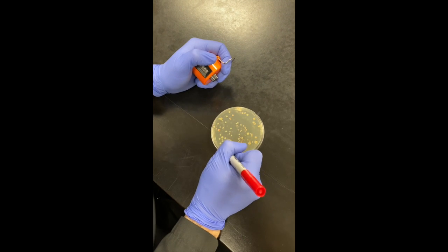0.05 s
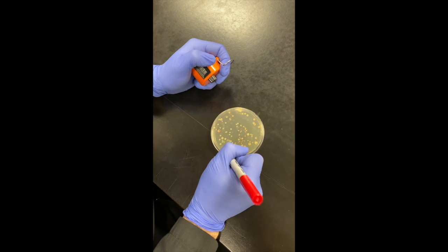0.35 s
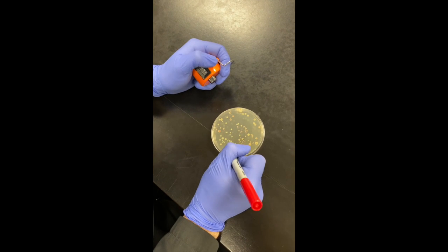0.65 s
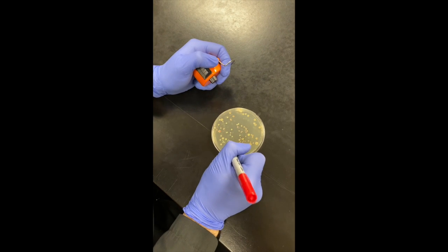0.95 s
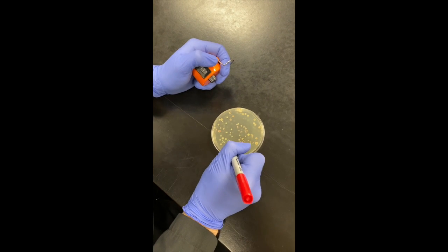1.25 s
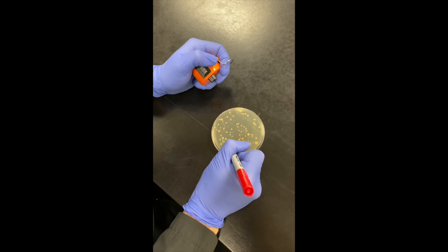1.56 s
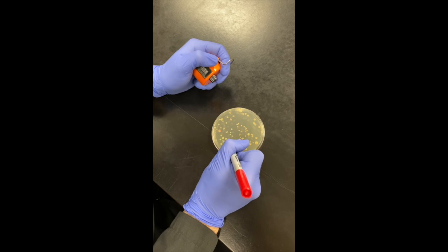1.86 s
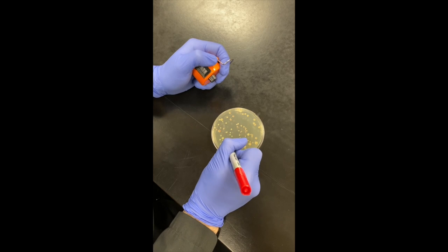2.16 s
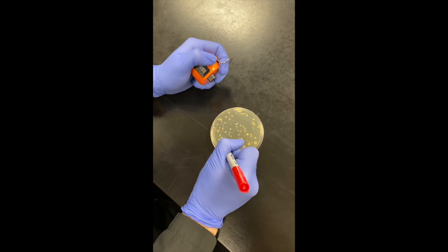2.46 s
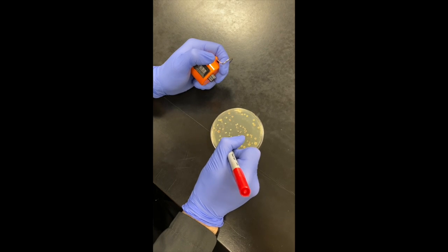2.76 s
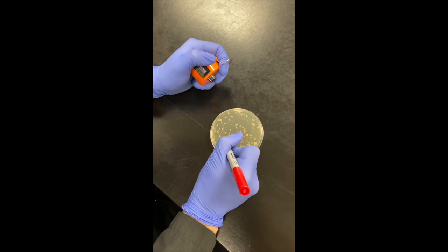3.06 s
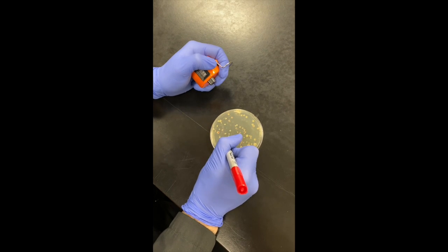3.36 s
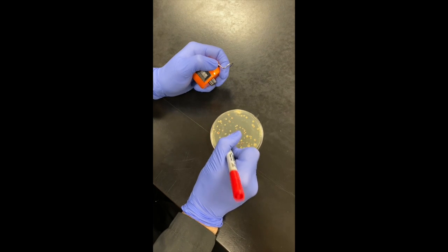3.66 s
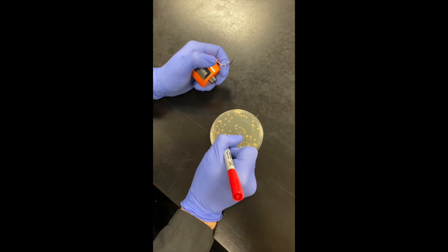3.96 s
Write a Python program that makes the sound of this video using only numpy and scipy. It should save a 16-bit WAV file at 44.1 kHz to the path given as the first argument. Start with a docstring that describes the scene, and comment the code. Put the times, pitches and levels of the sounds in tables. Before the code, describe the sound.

In a quiet lab with softly humming ventilation, a mechanical tally counter snaps and clacks back about three times a second, close by. Light, hollow marker taps on a plastic dish mix in at first and once more later.

```python
"""A hand tally counter, pressed eleven times by a thumb while colonies are counted in a quiet lab.
Per press: the spring chirps, a faint high tick sounds just before the snap, the pawl slides and strikes;
the button then clacks back. A marker now and then dots the plastic dish. Each sound is an impulse or a
burst of micro-contacts driving a body response. Ventilation hums; the bench and walls answer faintly."""
import sys
import numpy as np
from scipy import signal
from scipy.fft import rfft, irfft, next_fast_len
from scipy.io import wavfile
from scipy.ndimage import uniform_filter1d, map_coordinates

SR = 44100
rng = np.random.default_rng(int(sys.argv[2]) if len(sys.argv) > 2 else 0)


def store_wav(level_fs):
    """Save 16-bit WAV to argv[1]."""
    pcm = np.round(np.clip(np.atleast_2d(level_fs), -1, 1) * 32767)
    wavfile.write(sys.argv[1], SR, pcm.T.astype(np.int16))


N = 176400

# (time [s], snap [dB], tilt [dB/oct], pawl slide [s], spring lead [s], spring [dB], hollow knock [dB])
BUTTON_PRESSES = [(.2223, 1.5, 0.3, .001, 0.035, 2.5, 5), (0.5862, 2, -0.5, 0.0015, 0.03, -3.5, -3),
                  (0.954, 1, 1.5, .0016, .025, -5, 0), (1.2475, -2.5, 2, 0.0017, 0.043, -1, -10),
                  (1.6092, 0, 0.5, 0.0014, 0.032, 0.5, -10), (1.8751, -1.5, 0, .0014, 0.036, 0, -8),
                  (2.1903, -1.5, 1.5, 0.0015, 0.039, -0.5, -21), (2.4903, -0.5, 2, .0014, .032, 3, 3),
                  (2.936, 0.5, 3, 0.0019, 0.03, 1.5, -23), (3.3654, -.5, 1, .0021, .04, 1.5, -22),
                  (3.6723, 3.2, -0.1, 0.00091, 0.046, -4, -0.5)]
# (time [s], clack [dB], tilt [dB/oct], tick lead [s], tick [dB])
BUTTON_RETURNS = [(0.378, -7, 3, 0.0095, -2), (.7526, -6.5, 4, 0.0073, -3.5), (1.0892, -2.5, -1, .0058, -3),
                  (1.366, 0, -2, 0.0056, -3.5), (1.7451, 1.5, -0.5, 0.0052, -3),
                  (2.014, -7.5, -1, 0.0036, -9), (2.3125, -0.5, -2, 0.0025, -14),
                  (2.638, -6.5, 2.5, 0.00154, -10), (3.0764, -2.5, -1.5, 0.0031, -4.5),
                  (3.486, -1, -1, .003, -30), (3.8176, -0.5, -.5, 0.011, -4.5)]
# loose play of button and wheels (time [s], level [dB], tilt [dB/oct])
BUTTON_RATTLES = [(.571, -19, 0), (0.759, -23, -4), (3.642, -23, -2), (3.7939, -21, -6), (3.829, -22, -3),
                  (3.853, -25.5, -3)]
# (time [s], level [dB], tilt [dB/oct], rise [s], t60 [s], dish ring [dB])
MARKER_DOTS = [(.171, -10, -9, .0028, 0.14, -1), (0.278, -1, -1, 0.00126, 0.071, -2.5),
               (.511, -13.5, -13, .003, 0.059, 2), (.539, -18, -7, .0054, 0.13, 0),
               (.621, -5.5, -2, 0.0062, .082, -3), (.874, -17, -19, 0.0027, 0.076, -3),
               (0.977, -3, -2, 0.00183, 0.052, -2), (2.5284, -1.5, -1.5, 0.00046, 0.063, -1)]

# spectra of the close sounds (frequency [Hz], level [dB])
SNAP_COLOUR = [(300, -33.5), (900, -26.5), (1400, -13.5), (2100, -8.5), (2900, -6.5), (3520, 0.5),
               (3850, -5.5), (4480, 2.3), (5100, -5.5), (5750, 0), (7100, -8), (8200, -6.5), (10500, -10.5),
               (13000, -20.5), (15400, -17), (16800, -48)]
SLIDE_COLOUR = [(500, -32), (1400, 0), (3200, -4.5), (3900, -2), (4450, 0), (5100, 9), (5800, 5.5),
                (7200, -4.5), (10500, -3.5), (13000, -2), (15300, -4), (16800, -7)]
HIGH_TICK_COLOUR = [(1000, -39), (3000, -10), (5000, -3.5), (6000, -1.5), (7500, -25), (12000, -25),
                    (16000, -31)]
SPRING_COLOUR = [(800, -15), (2150, -19), (2550, -1), (2820, 6), (3250, -11), (4500, -11.5), (7000, -22),
                 (11000, -32), (15500, -29)]
HOLLOW_COLOUR = [(200, -38), (700, -13.5), (1350, 4.5), (2100, 5), (3200, -5.5), (8000, -41)]
CLACK_COLOUR = [(400, -13), (1400, -10.5), (2000, -12), (2550, 0), (3100, -1), (3500, -1), (4900, -5.5),
                (5600, -4.5), (7100, -9.5), (9700, -11.5), (11000, -20), (13500, -16), (15200, -7.5),
                (16500, -28)]
DISH_COLOUR = [(100, -41), (350, -6.5), (620, -2), (880, -8.5), (1110, 3), (1450, -7.5), (1750, -9.5),
               (2050, -17), (2500, -1), (2950, -6.5), (3350, -2.5), (3750, -14), (4150, 2), (4800, -11.5),
               (5800, -5.5), (8500, -16), (15500, -20.5)]
# modes of the counter's steel and the dish (frequency [Hz], level [dB], t60 [s])
STEEL_MODES = [(3140, -7, 0.015), (3553, -4, 0.015), (4460, -4, .013), (5850, 3, 0.0075),
               (6250, -1.5, 0.0057), (7930, -2.5, .008), (15200, -7, .0086)]
PLASTIC_MODES = [(1042, -6, 0.041), (1149, 0, 0.056), (1740, -10, 0.032), (4230, -4, 0.048)]

# background spectra (frequency [Hz], level [dB])
AIR_COLOUR = [(20, -13), (35, -11.5), (55, -.7), (95, -3), (135, 1), (200, -1.7), (300, -8), (600, -12),
              (950, -17), (2000, -19), (3500, -23), (6000, -31), (8000, -38), (11000, -46), (15300, -42),
              (16300, -70)]
BENCH_COLOUR = [(300, 9), (3000, 0.5), (6000, -24), (10000, 4), (16000, 1.5)]
REVERB_COLOUR = [(300, 1.5), (1500, 2.5), (3000, 6.5), (4500, 3), (6000, -1), (9000, -8.5), (12000, -4.5),
                 (15000, 3)]
# hum (frequency [Hz], rms level [dB])
FAN_LINES = [(122, -51.5), (350.5, -59.5), (468.3, -58.5), (559.8, -62)]
# wall tail (frequency [Hz], t60 [s])
ROOM_DECAY = [(300, 1), (2000, 0.086), (5000, 0.21), (9000, 0.16), (15000, 0.2)]
# ventilation (frequency [Hz], left-right correlation [0-1])
AIR_CORRELATION = [(60, 1), (130, 0.99), (250, 0.98), (500, 0.75), (1000, 0.7), (2500, 0.41), (6000, 1),
                   (14000, 1)]
# ventilation; close sounds with their reverb (frequency [Hz], left minus right [dB])
VENT_BALANCE = [(50, 0), (250, -0.7), (500, -5), (1000, 0.5), (2000, -0.5), (6000, 0)]
CLOSE_BALANCE = [(500, -1.5), (1200, 2), (1800, -1), (2600, -3), (3600, -1.5), (6000, 0.5), (15000, 0.5)]
# phase between the ports (frequency [Hz], left lead [rad])
PORT_LEAD = [(900, 0.15), (1700, 0.13), (2800, 1.52), (3600, 1.1), (4700, 1.66), (5600, 1.39), (8900, 2.97),
             (10200, 3.09), (12000, 3.78), (14000, 4.7), (16000, 8.8)]

# base levels; the event tables add to them
SPRING_DB, SPRING_RISE_S, SPRING_T60_S = -17.5, 0.0014, 0.025
HIGH_TICK_DB, HIGH_TICK_LEAD_S, HIGH_TICK_T60_S = -20, 0.0085, 0.011
SLIDE_DB, SNAP_DB, STEEL_DB, HOLLOW_DB = -4, -0.3, -5, -17
CASE_DB, CASE_RISE_S, CASE_T60_S = -4, 0.0021, 0.0074
SEAT_DB, SEAT_DELAY_S, SEAT_RISE_S, SEAT_T60_S = -18, 0.0095, 0.00028, 0.028
RETURN_TICK_DB, CLACK_HIT_DB = -14, -12.5
CLACK_DB, CLACK_RISE_S, CLACK_T60_S = -9.5, 0.00058, 0.019
DISH_DB, DISH_RING_DB = -5, -12
CRACK_DB, CRACK_LOSS_DB_PER_S, CRACK_TILT_DB_OCT = -12, 5000, 5.6
AIR_DB, AIR_WAVER_DB, HUM_WAVER_DB, HUM_WAVER_HZ = -43.5, 1.2, 2.34, 1.51
ROOM_DB, ROOM_CORRELATION = -18.5, 0.75
BENCH_DB, BENCH_DELAY_S, BENCH_T60_S = -15, 0.0005, 0.0108
TILT_FROM_HZ = 1100  # contact hardness changes the colour above this
BAND_LIMIT_HZ = 16900


def counter_presses():
    """Spring chirp; a faint high tick; the pawl slides and strikes; the case rattles, knocks again."""
    out = np.zeros(N)
    for time_s, db, tilt_db_oct, slide_s, spring_lead_s, spring_db, hollow_db in BUTTON_PRESSES:
        case = body(SNAP_COLOUR, tilt_db_oct)
        chirp = chatter(SPRING_RISE_S, SPRING_T60_S)
        add(out, time_s - spring_lead_s, SPRING_DB + spring_db, chirp, body(SPRING_COLOUR))
        tick = chatter(0, HIGH_TICK_T60_S)
        add(out, time_s - HIGH_TICK_LEAD_S, HIGH_TICK_DB, tick, body(HIGH_TICK_COLOUR))
        friction = flat_noise(np.ones(max(2, round(slide_s * SR))))
        add(out, time_s - slide_s, SLIDE_DB, friction, body(SLIDE_COLOUR, tilt_db_oct))
        add(out, time_s, SNAP_DB + db, impulse(), case)
        add(out, time_s, STEEL_DB + db, impulse(), ringing(STEEL_MODES))
        add(out, time_s, HOLLOW_DB + hollow_db, impulse(), body(HOLLOW_COLOUR))
        add(out, time_s, CASE_DB + db, chatter(CASE_RISE_S, CASE_T60_S), case)
        add(out, time_s + SEAT_DELAY_S, SEAT_DB + db, chatter(SEAT_RISE_S, SEAT_T60_S), case)
    return out


def button_returns():
    """The button is let go: a tick, then a looser, duller clack."""
    out = np.zeros(N)
    for time_s, db, tilt_db_oct, tick_lead_s, tick_db in BUTTON_RETURNS:
        button = body(CLACK_COLOUR, tilt_db_oct)
        tick = chatter(0, HIGH_TICK_T60_S)
        add(out, time_s - tick_lead_s, RETURN_TICK_DB + tick_db, tick, body(HIGH_TICK_COLOUR))
        add(out, time_s, CLACK_HIT_DB + db, impulse(), button)
        add(out, time_s, CLACK_DB + db, chatter(CLACK_RISE_S, CLACK_T60_S), button)
    return out


def button_rattles():
    """The loose button shifts faintly in its case."""
    out = np.zeros(N)
    for time_s, db, tilt_db_oct in BUTTON_RATTLES:
        add(out, time_s, db, chatter(0, t60_s=0.021), body(CLACK_COLOUR, tilt_db_oct))
    return out


def marker():
    """The felt tip lands, cracking when quick; the dish rings hollow and chatters on the bench."""
    out = np.zeros(N)
    for time_s, db, tilt_db_oct, rise_s, t60_s, ring_db in MARKER_DOTS:
        crack_db = CRACK_DB + db - CRACK_LOSS_DB_PER_S * rise_s
        bright_dish = body(DISH_COLOUR, tilt_db_oct + CRACK_TILT_DB_OCT)
        add(out, time_s, crack_db, chatter(0, t60_s=0.0035), bright_dish)
        add(out, time_s, DISH_DB + db, chatter(rise_s, t60_s), body(DISH_COLOUR, tilt_db_oct))
        add(out, time_s + rise_s, DISH_RING_DB + db + ring_db, impulse(), ringing(PLASTIC_MODES))
    return out


def ventilation():
    """A rush of air with a few slightly unsteady fan lines."""
    air = coloured(rng.standard_normal((2, N)), AIR_COLOUR)
    correlation = along(AIR_CORRELATION, np.fft.rfftfreq(N, 1 / SR))
    air = irfft(stereo_pair(rfft(air), correlation), N)
    air = unit_rms(air) * amp(AIR_DB + AIR_WAVER_DB * wobble(rate_hz=8.01))
    hum = np.zeros(N)
    for hz, db in FAN_LINES:
        peak = np.sqrt(2) * amp(db + HUM_WAVER_DB * wobble(rate_hz=5.996))
        pitch_hz = hz + HUM_WAVER_HZ * wobble(rate_hz=6.96)
        hum += peak * np.sin(2 * np.pi * np.cumsum(pitch_hz) / SR)
    return panned(air + hum, VENT_BALANCE)


def room(x, blocks=14):
    """Quick scatter off the bench and a soft wall tail, drawn anew for each block."""
    out = np.zeros((2, N))
    for block in np.array_split(np.arange(N), blocks):
        noise = stereo_pair(rng.standard_normal((2, SR // 2)), ROOM_CORRELATION)
        hz, t, spectra = signal.stft(noise, SR, nperseg=256)
        decay = 1000 ** (-t / along(ROOM_DECAY, hz)[:, None])
        tail = signal.istft(spectra * decay, SR, nperseg=256)[1]
        tail *= amp(ROOM_DB) / np.linalg.norm(tail[0])
        for side in tail:
            add(side, BENCH_DELAY_S, BENCH_DB, chatter(0, BENCH_T60_S), body(BENCH_COLOUR))
        start = block[0]
        wet = signal.fftconvolve(x[None, block], tail, axes=1)[:, :N - start]
        out[:, start:start + wet.shape[1]] += wet
    return coloured(out, REVERB_COLOUR)


def add(track, time_s, db, force, response):
    """Drive a body with a force at time_s; db sets the energy of the result."""
    sound = signal.fftconvolve(force, response)
    part = track[round(time_s * SR):][:len(sound)]
    part += amp(db) * sound[:len(part)] / np.linalg.norm(sound)


def impulse():
    """One hard contact."""
    return np.ones(1)


def chatter(rise_s, t60_s):
    """A burst of random micro-contacts that swells and dies."""
    t = np.arange(SR // 8) / SR
    swell = 1 - np.exp(-t / max(rise_s, 1 / SR))
    return flat_noise(swell * 1000 ** (-t / t60_s))


def flat_noise(envelope, passes=4, window_samples=32):
    """Random contacts under an envelope, whitened so the body alone sets the colour."""
    x = rng.standard_normal(len(envelope)) * envelope
    for _ in range(passes):
        phase_rad = np.angle(rfft(x, 2 * len(x)))
        x = irfft(np.exp(1j * phase_rad))[:len(x)]
        local_power = np.abs(uniform_filter1d(x ** 2, window_samples))
        x = x * envelope / np.sqrt(local_power + 1e-20)
    return x


def body(colour, tilt_db_oct=0, size=4096):
    """Minimum-phase impulse response of energy 1 with this colour and treble tilt."""
    hz = np.fft.rfftfreq(size, 1 / SR)
    octaves = np.log2(np.maximum(hz / TILT_FROM_HZ, 1))
    cepstrum = irfft(np.log(amp(along(colour, hz) + tilt_db_oct * octaves)))
    cepstrum[1:size // 2] *= 2
    cepstrum[size // 2 + 1:] = 0
    response = irfft(np.exp(rfft(cepstrum)))
    return response / np.linalg.norm(response)


def ringing(modes, spread_db=1, detune=0.004):
    """Damped sines; pitch and strength vary per blow as the grip and wheels shift."""
    t = np.arange(SR // 10) / SR
    out = np.zeros(len(t))
    for hz, db, t60_s in modes:
        envelope = amp(db + rng.normal(0, spread_db) - 60 * t / t60_s)
        pitch_hz = hz * (1 + detune * rng.normal())
        out += envelope * np.sin(2 * np.pi * pitch_hz * t)
    return out


def amp(db):
    return 10 ** (np.asarray(db) / 20)


def unit_rms(x):
    return x / np.sqrt(np.mean(x ** 2) + 1e-20)


def along(points, hz):
    """Interpolate (frequency [Hz], value) points on a log axis."""
    knots_hz, values = np.transpose(points)
    return np.interp(np.log(hz + 1), np.log(knots_hz + 1), values)


def wobble(rate_hz):
    """Smooth random curve, rate_hz knots a second."""
    knots = rng.standard_normal(int(N * rate_hz / SR) + 4)
    return map_coordinates(knots, [np.arange(N) * rate_hz / SR])


def filtered(x, response):
    """Apply a complex frequency response."""
    size = next_fast_len(N + SR // 2)
    hz = np.fft.rfftfreq(size, 1 / SR)
    return irfft(rfft(x, size) * response(hz), size)[..., :N]


def coloured(x, colour):
    return filtered(x, lambda hz: amp(along(colour, hz)))


def panned(x, balance):
    return filtered(x, lambda hz: amp(split_sides(along(balance, hz))))


def split_sides(difference):
    """Plus half to the left, minus half to the right."""
    return difference * np.array([[0.5], [-0.5]])


def stereo_pair(sources, correlation):
    """Mix two unrelated signals to a left and right of given correlation."""
    angle_rad = np.arccos(np.clip(correlation, -1, 1)) / 2
    mid, side = np.cos(angle_rad) * sources[0], np.sin(angle_rad) * sources[1]
    return np.array([mid + side, mid - side])


def scene():
    """Counter and marker close by, with room and ventilation."""
    close = counter_presses() + button_returns() + button_rattles() + marker()
    return panned(close + room(close), CLOSE_BALANCE) + ventilation()


def record(dry):
    """The left port leads the right a little; a steep low-pass limits the band."""
    def response(hz):
        lead_rad = np.interp(hz, *np.transpose([(0, 0)] + list(PORT_LEAD)))
        low_pass = 1 / (1 + (hz / BAND_LIMIT_HZ) ** 200)
        return np.exp(1j * split_sides(lead_rad)) * low_pass
    return filtered(dry, response)


dry = scene()
out = record(dry)
store_wav(out)
```